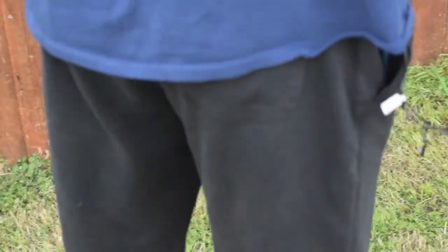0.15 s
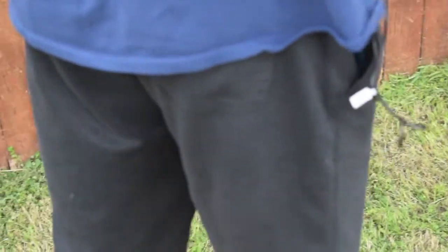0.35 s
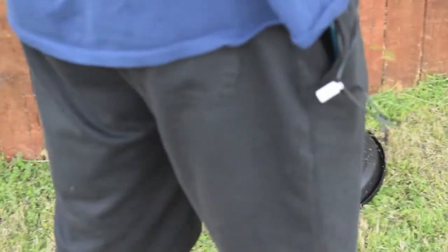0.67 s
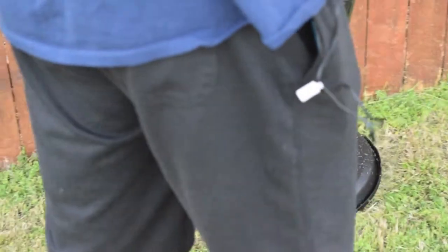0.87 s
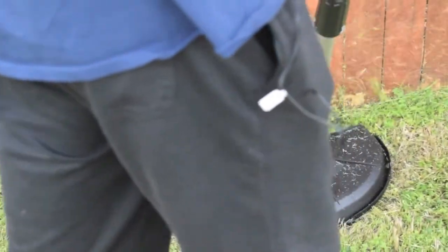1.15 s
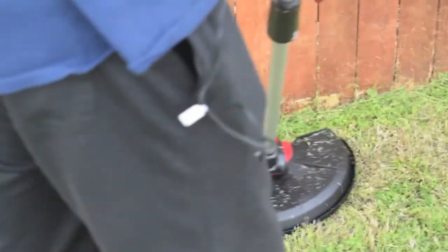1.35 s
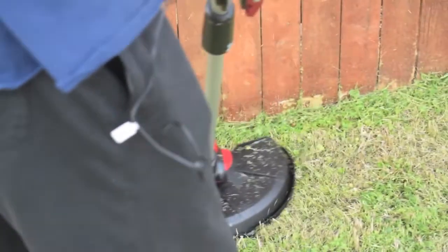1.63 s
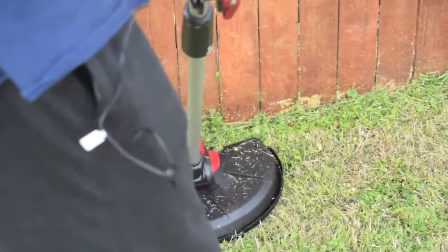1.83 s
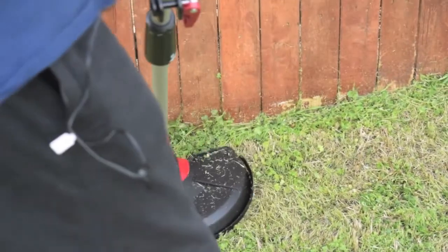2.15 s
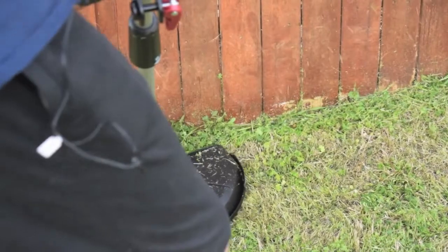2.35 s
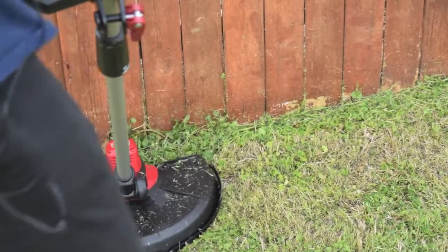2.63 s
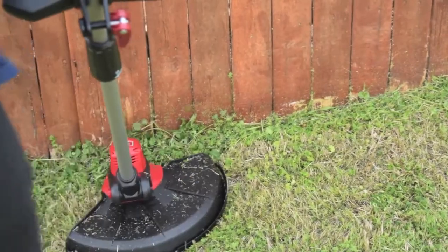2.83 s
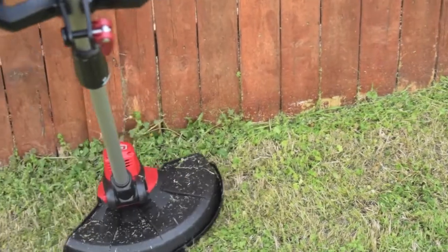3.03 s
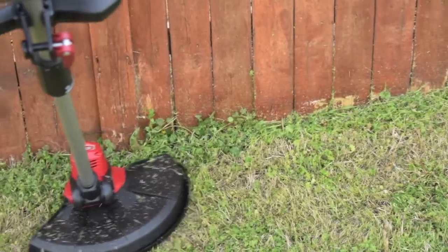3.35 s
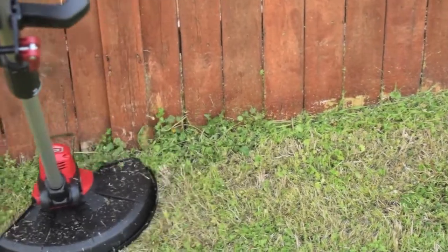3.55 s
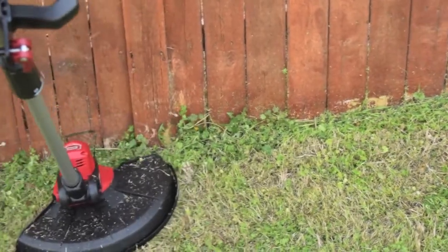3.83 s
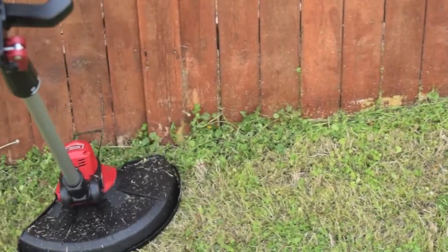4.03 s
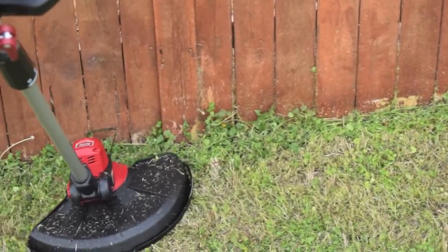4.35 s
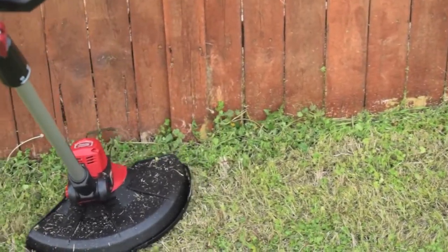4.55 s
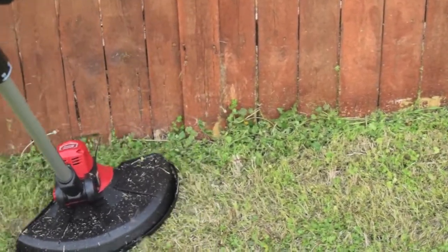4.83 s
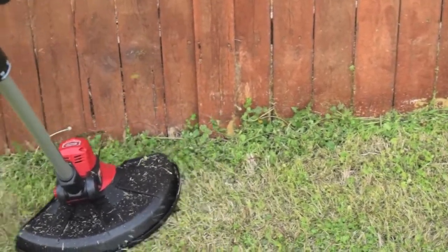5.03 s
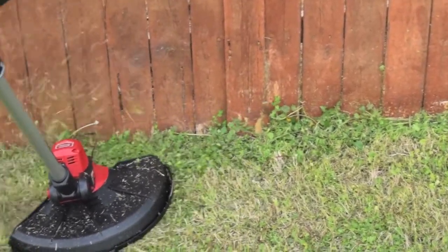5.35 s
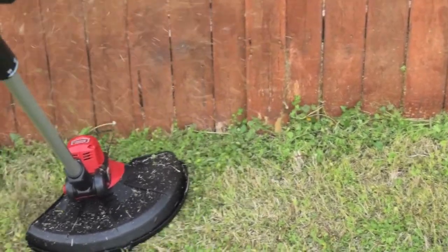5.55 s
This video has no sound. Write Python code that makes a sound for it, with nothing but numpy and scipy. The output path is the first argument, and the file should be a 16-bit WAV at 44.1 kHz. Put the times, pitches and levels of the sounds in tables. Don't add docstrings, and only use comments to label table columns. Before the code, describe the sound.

A cordless string trimmer runs throughout at close range, heard dry and identical in both channels, with a faint breeze and traffic rumble buried underneath. The tone is a dense buzz around 415 to 425 Hz with many harmonics, topped by a strong fluttering hiss centred near 7 to 8 kHz. It begins already loaded, thrashing grass, with snaps and thuds at 0.1 and 0.36 s, then recovers. At 1.2 to 1.4 s a heavy bite drops the pitch audibly, with ragged slaps, stalk snaps and fence knocks. From 1.5 to 3.7 s it runs fairly steadily, with small dips and slightly fuller hiss. A tight burst of bright cracks and snaps comes at 3.75 to 3.9 s. The drone then smooths out, with a brief dip and snap near 5.05 s. From 5.58 s until the cut at 5.7 s, thick grass slows it again, with rapid snaps and thuds.

```python
import sys
import numpy as np
from scipy import signal
from scipy.fft import rfft, irfft, next_fast_len
from scipy.io import wavfile
from scipy.ndimage import uniform_filter1d

SR = 44100
rng = np.random.default_rng(int(sys.argv[2]) if len(sys.argv) > 2 else 0)


def gain_from_db(level_db):
    decades = np.asarray(level_db, float) / 20
    return 10 ** decades


def inscribe(sig):
    pcm = np.round(np.clip(np.atleast_2d(sig).T, -1, 1) * 32767)
    wavfile.write(sys.argv[1], SR, pcm.astype(np.int16))


N = 250929


def evened(x):
    return x / np.sqrt(np.mean(x ** 2) + 1e-20)


def levelled(x, width):
    return x / np.sqrt(uniform_filter1d(x ** 2, width) + 1e-20)


def curves(rows, t):
    s, *columns = np.transpose(rows)
    return [np.interp(t, s, c) for c in columns]


def read(points, hz):
    f, db = np.transpose(points)
    return np.interp(np.log(hz + 1), np.log(f + 1), db)


def coloured(x, points):
    size = next_fast_len(N)
    gain = gain_from_db(read(points, np.fft.rfftfreq(size, 1 / SR)))
    return evened(irfft(rfft(x, size) * gain, size)[:N])


def high_pass(x, hz):
    return signal.sosfilt(signal.butter(2, hz, "high", fs=SR, output="sos"), x)


def drift(count, seconds):
    steps = rng.standard_normal((count, N // 441 + 2))
    width = round(seconds * 100)
    steps = evened(uniform_filter1d(uniform_filter1d(steps, width, 1), width, 1))
    return np.array([np.interp(np.arange(N) / 441, np.arange(len(v)), v) for v in steps])


def per_pass(turns):
    count = 2 * len(turns) // 300
    return np.interp(2 * turns, np.arange(count), rng.standard_normal(count))


# time in seconds, stance (0 shaded, 1 beside, 2 open, 3 turned, 4 shaded).
STANCE = [
    (0, 0),
    (1.3, 0),
    (1.7, 1),
    (2.75, 1),
    (2.88, 2),
    (3.72, 2),
    (3.95, 3),
    (4.95, 3),
    (5.15, 4),
    (5.69, 4),
]


def by_stance(values, t):
    return np.interp(curves(STANCE, t)[0], np.arange(len(values)), values)


# centre in seconds, half width in seconds, drag in turns per s,
# thrash in dB, swish in dB.
BITES = [(0.025, 0.08, 9.5, -37.5, -33.5), (0.139, 0.028, 6.8, -31, -36), (0.36, 0.033, 5.3, -34.5, -40),
         (0.461, 0.14, 3.4, -39.5, -38), (0.784, 0.13, 3.2, -43.5, -47), (1.03, 0.083, 2.65, -43.5, -59),
         (1.228, 0.057, 5.4, -37.5, -34), (1.311, 0.053, 17.7, -31, -46), (1.506, 0.069, 2.62, -40.5, -41),
         (1.831, 0.158, 3.33, -40.5, -37), (2.062, 0.068, 3.5, -40.9, -38), (2.41, 0.21, 2.76, -41, -37.5),
         (2.556, 0.076, 2.13, -38.5, -41), (2.973, 0.19, 2.13, -44, -44.5), (3.462, 0.12, 2.68, -44.5, -37),
         (3.796, 0.031, 8.2, -36, -30), (3.886, 0.063, 4.7, -38, -31.5), (4.029, 0.055, 4, -43.3, -35),
         (4.34, 0.2, 2.85, -50, -38.5), (4.745, 0.17, 1.34, -47, -41.5), (5.067, 0.059, 10.1, -35.5, -38),
         (5.31, 0.11, 3.4, -44.5, -36.5), (5.591, 0.026, 8.5, -31, -30.5), (5.669, 0.094, 19, -33.5, -37)]
BITE_S, BITE_WIDTH_S, BITE_DRAG, BITE_THRASH_DB, BITE_SWISH_DB = np.transpose(BITES)


def contact(sizes, t, power=1):
    steps = np.arange(N // 147 + 2) / 300
    bells = [np.exp(-.5 * power * ((steps - s) / width) ** 2) for s, width in zip(BITE_S, BITE_WIDTH_S)]
    return np.interp(t, steps, sizes @ np.array(bells))


def sag(t):
    start_sag, recover_s = 9.15, .0913
    steps = np.arange(N // 441 + 2) / 100
    r = np.exp(-steps[1] / recover_s)
    lost = signal.lfilter([1 - r], [1, -r], contact(BITE_DRAG, steps), zi=[r * start_sag])[0]
    return np.interp(t, steps, lost)


def shaft_turns(t):
    start_turn, free_turns_per_s, tiring_turns_per_s2 = .08, 107.0, .022
    return start_turn + np.cumsum(free_turns_per_s - tiring_turns_per_s2 * t - sag(t)) / SR


# time in seconds, fourth order in dB, second order in dB.
HEAD = [(0.0, -33, -43), (.2, -30.5, -43), (.5, -28.5, -49.5), (.6, -29, -62), (.9, -30, -52),
        (1.25, -28, -45), (1.33, -32, -37.5), (1.49, -31, -53), (1.63, -27.5, -40.5), (2.3, -29.5, -39.5),
        (3.0, -31.5, -38.5), (3.6, -32.5, -43), (4.07, -31, -43), (4.36, -29, -47.5), (4.9, -29, -54.5),
        (5.06, -29, -43.5), (5.3, -30.5, -50), (5.69, -32, -40)]
# multiple of shaft rate, level in dB.
SHADED_ORDERS = [(1, -43), (2, -25), (3, -21.5), (4, 3), (5, -13.5), (6, -5), (7, -16), (8, -12.5),
                 (9, -20.5), (10, -6.5), (11, -39), (12, -12.5), (13, -43), (14, -16), (15, -115),
                 (16, -16.5), (17, -67), (18, -32), (19, -20), (20, -16.5), (21, -55), (22, -16.5),
                 (23, -60), (24, -21.5), (25, -43), (26, -25)]
BESIDE_ORDERS = [(1, -36.5), (2, -13), (3, -24), (4, 1.5), (5, -14), (6, -5), (7, -15.5), (8, -10.5),
                 (9, -19), (10, -5), (11, -37), (12, -14), (13, -23), (14, -16), (15, -46), (16, -17),
                 (17, -19.5), (18, -38), (19, -24), (20, -15.5), (21, -44), (22, -19.5), (23, -21),
                 (24, -34), (25, -24), (26, -27)]
OPEN_ORDERS = [(1, -45.5), (2, -11), (3, -21), (4, 2.5), (5, -15), (6, -6), (7, -16.5), (8, -16.5),
               (9, -20), (10, -10), (11, -33), (12, -17), (13, -22), (14, -11), (15, -75), (16, -10),
               (17, -23), (18, -14), (19, -23), (20, -14), (21, -26), (22, -16.5), (23, -57), (24, -21.5),
               (25, -40), (26, -21.5)]
TURNED_ORDERS = [(1, -39.5), (2, -22), (3, -24.5), (4, 1.5), (5, -15.5), (6, -8.5), (7, -16.5), (8, -12.5),
                 (9, -21), (10, -6.5), (11, -30), (12, -13.5), (13, -25), (14, -14), (15, -47), (16, -14),
                 (17, -40), (18, -16), (19, -33), (20, -14), (21, -34), (22, -13), (23, -29), (24, -16.5),
                 (25, -29), (26, -22)]
# 28th, 34th, 40th, 46th order in dB re the 26th.
FAINT_ORDERS = [
    (-6, -3, -2, -12),
    (-3, -2, -3, -18),
    (-1.5, -11, -5.5, -4),
    (-2, -3, -7, -3),
    (-2, -4, -15, -16),
]
UPPER_DB = [-2.1, -2.03, -1.2, -1.42, -0.15]
UNBALANCE_DB = [9, 0.5, 7.5, -1.5, 6.5]
# start in seconds, length in seconds, first order extra in dB.
WOBBLES = [
    (2, 0.34, 12),
    (3.059, 0.34, 8.5),
]


def thump(t, turns):
    main_db, second_db = curves(HEAD, t)
    upper_db = by_stance(UPPER_DB, t) - 0.97 * (main_db - main_db.mean())
    main_db = main_db - 0.19 * (contact(BITE_DRAG, t) - 3.0)
    blur_db = 0.17 * (sag(t) - 3.0)
    whine_db = 0.4 * (uniform_filter1d(sag(t - .12), size=4410) - 3.0)
    unbalance_db = by_stance(UNBALANCE_DB, t)
    for s, length, db in WOBBLES:
        unbalance_db = unbalance_db + db * np.clip(np.minimum(t - s, s + length - t) / 0.049, 0, 1)
    stances = [SHADED_ORDERS, BESIDE_ORDERS, OPEN_ORDERS, TURNED_ORDERS, SHADED_ORDERS]
    orders_db = np.array(stances)[:, :, 1].T
    faint = np.arange(28, 48, 2)
    faint_db = np.transpose([np.interp(faint, faint[::3], row) for row in FAINT_ORDERS])
    orders = np.r_[np.arange(len(orders_db)) + 1, faint]
    orders_db = np.r_[orders_db, orders_db[-1] + faint_db]
    out = 0
    for k, levels_db, w in zip(orders, orders_db, drift(count=len(orders), seconds=.06)):
        unsteady_db = .3 if k == 4 else 0.95 + 0.019 * min(k, 20)
        db = main_db + by_stance(levels_db, t) + unsteady_db * w
        if k == 1:
            db = db + unbalance_db
        if k == 2:
            db = second_db
        if k > 4:
            db = db + upper_db
        if k > 12:
            db = db - blur_db
        if k > 27:
            db = db + whine_db + 4.0 * (np.minimum(w, .5) - .6)
        lag = np.angle(1 - (k / 4) ** 2 + 1.2j * k / 4) + 1.2 * (k % 2)
        lag = lag + np.exp(-((k - 11) / 2) ** 2)
        phase = 2 * np.pi * k * turns - lag + 0.051 * k * w
        out = out - gain_from_db(db) * np.sqrt(2) * np.sin(phase)
    return out


# time in seconds, hiss in dB, treble in dB for a clear view past the legs.
HISS = [(0, -22.5, -1.5), (.27, -21, -4.5), (.7, -20.5, -1), (.9, -18, 3), (1.17, -18, 2), (1.33, -23.5, 0),
        (1.46, -18.5, 5.5), (1.7, -18, 2.5), (2.06, -18, -4), (2.71, -17, 3), (3.0, -17.5, -1.5),
        (3.79, -21.5, 0.5), (3.96, -20.5, -3), (4.58, -19.5, -3), (5.15, -19, 0), (5.31, -17.5, 2),
        (5.51, -16.5, 2.5), (5.62, -22.5, 1.5)]
# frequency in Hz, density in dB per Hz.
HISS_COLOUR = [(2500, -47), (3800, -30.5), (5000, -15.5), (6500, -7), (7500, -1), (9000, -2), (10500, -7.5),
               (12000, -14.5), (13000, -23.5), (15700, -31.5), (17000, -66)]
# lower skirt, upper skirt, whistle prominence, skirt foot, all in dB.
SKIRTS = [
    (-9.5, -8, 3.5, -23.5),
    (-9, -8, 3, -26),
    (-9.5, -7, 3, -28),
    (-13, -6, 3.5, -27.5),
    (-12.5, -10.5, 3.5, -27),
]
# time in seconds, frequency in Hz.
WHISTLE = [(0, 7400), (1.2, 7400), (1.5, 7050), (2.0, 7300), (2.35, 7650), (2.75, 7100), (2.83, 7850),
           (3.05, 7700), (3.5, 8000), (3.8, 8000), (4.15, 8400), (4.3, 8200), (4.42, 7700), (4.65, 7750),
           (4.92, 8200), (5.05, 7500), (5.69, 7250)]
TWIN_DB = [0.55, 1.19, 2.37, 2.33, 0.04]
# time in seconds, frequency in Hz, depth in dB.
GROUND = [(2.75, 4600, 0), (2.92, 4700, 6), (3.3, 4800, 7), (3.5, 5050, 6), (3.75, 5150, 5),
          (3.85, 5100, 1), (4.1, 5150, 4), (4.4, 5050, 2), (4.7, 4800, 3), (4.92, 4600, 4), (5.05, 4600, 0)]
# time in seconds, level in dB.
TILT = [(0, -8), (.3, 1), (.9, 0), (1.3, -0.5), (1.5, 6), (1.8, 2.5), (2.3, -3.5), (2.6, 0), (2.9, 3),
        (3.1, -3), (3.7, -3.5), (4.4, -1), (4.55, 0), (4.8, -1), (5.03, 10.5), (5.2, -4), (5.69, 0)]


def hiss_db(t, at, hz):
    def bump(centre_hz, width_hz):
        return np.exp(-((hz - centre_hz) / width_hz) ** 2)

    low_db, high_db, whistle_db, foot_db = (by_stance(c, at) for c in np.transpose(SKIRTS))
    sway = [np.interp(at, t, w) for w in drift(count=4, seconds=.08)]
    lost = sag(at) - 3.0
    tilt_db, clear_db = curves(TILT, at)[0], curves(HISS, at)[1]
    low_db = low_db + 0.39 * lost + 0.5 * sway[0] + 0.2 * tilt_db
    foot_db = foot_db + 0.63 * lost + 0.55 * sway[1] + tilt_db
    high_db = high_db + 1.5 * sway[2] + clear_db
    whistle_db = whistle_db + 1.3 * sway[3]
    whistle_hz = curves(WHISTLE, at)[0]
    notch_hz, notch_db = curves(GROUND, at)
    foot = 1 / (1 + np.exp((hz - 5250) / 120))
    low = (1 - foot) * np.clip((7600 - hz) / 1500, 0, 1)
    high = 1 / (1 + np.exp((9500 - hz) / 300))
    db = read(HISS_COLOUR, hz - 0.28 * (whistle_hz - 7500) * bump(7500, 2000))
    db = db + low * (low_db + 12.5) + high * (high_db + 12.0) + foot * (foot_db + 26.0)
    db = db + whistle_db * bump(whistle_hz, 380) - notch_db * bump(notch_hz, 260)
    return db + by_stance(TWIN_DB, at) * bump(whistle_hz + 1200, 350)


def hiss(t, turns):
    frames, hz = N // 128 + 5, np.fft.rfftfreq(512, 1 / SR)[:, None]
    at = np.arange(frames) * 128 / SR - 128 / SR
    a, b, patches = rng.standard_normal((frames, 257, 3)).T
    patches = evened(uniform_filter1d(uniform_filter1d(patches, 6, 0), 60, 1))
    z = (a + 1j * b) * gain_from_db(hiss_db(t, at, hz) + 1.2 * patches)
    upper = 1 / (1 + np.exp((8200 - hz) / 400))
    unlike = .12 + 0.047 * np.maximum(sag(t) - 2.5, 0)
    aim = .5 * drift(count=1, seconds=0.9)[0]
    out = 0
    for share, lead, depth in ((np.sqrt(1 - upper), 0, .36), (np.sqrt(upper), .9, .3)):
        beam = depth * np.cos(4 * np.pi * turns + lead + aim)
        beam = beam + .5 * unlike * np.cos(2 * np.pi * turns + lead)
        noise = signal.istft(z * share, nperseg=512, noverlap=384)[1][:N]
        out = out + noise * np.exp(beam) * gain_from_db(0.99 * per_pass(turns))
    return gain_from_db(curves(HISS, t)[0]) * levelled(out, 6000)


# frequency in Hz, density in dB per Hz.
THRASH = [(60, -42), (120, -19.5), (180, -4), (250, -3.5), (450, 6), (800, 4), (1200, 5), (1600, -17.5),
          (2200, -9), (3500, -29)]
# frequency in Hz, density in dB per Hz.
SWISH = [(800, -17), (1400, -5), (2000, 1.5), (2600, -3.5), (3300, -9), (4200, -10.5), (5000, -7.5),
         (6000, -6.5), (12000, -19), (15700, -9)]


def grass(t, turns):
    idle_thrash_db, idle_swish_db = -48.5, -39.5
    ragged = drift(count=2, seconds=.03)
    thrash_gain = np.sqrt(gain_from_db(idle_thrash_db) ** 2 + contact(gain_from_db(BITE_THRASH_DB) ** 2, t, 1.76))
    swish_gain = np.sqrt(gain_from_db(idle_swish_db) ** 2 + contact(gain_from_db(BITE_SWISH_DB) ** 2, t, 1.6))
    passes = np.diff(np.floor(2 * turns + .06 * per_pass(turns)), prepend=0)
    slaps = passes * rng.standard_normal(N)
    burst = np.exp(-(2 * turns % 1) / .3) * gain_from_db(3.0 * per_pass(turns))
    skim = 1 / (1 + (contact(BITE_DRAG, t) / 12) ** 2)
    wash = (0.22 + 1.6 * skim + burst) * rng.standard_normal(N)
    thrash = levelled(0.35 * coloured(slaps, THRASH) + 1.2 * coloured(wash, THRASH), 4000)
    swish = coloured((0.71 + burst) * rng.standard_normal(N) + 5.2 * slaps, SWISH)
    thrash = thrash_gain * gain_from_db(1.5 * ragged[0]) * thrash
    return thrash + swish_gain * gain_from_db(0.4 * ragged[1] - 3.0) * swish


FENCE_SHARE = [0.1, 0.033, 0.093, 0.065, 0.06]


def fence(x, t):
    late = np.interp(t - 0.001, t, signal.lfilter([.5, .5], [1], x))
    return x - by_stance(FENCE_SHARE, t) * late


# time in seconds, frequency in Hz, depth in dB.
HOLLOW = [(0, 3900, 0), (.3, 3700, 4), (.7, 3100, 5), (1.3, 3700, 4), (1.5, 3100, 2), (2.1, 3850, 5),
          (2.6, 3400, 3), (3.1, 3900, 6), (3.3, 3900, 5), (3.5, 4100, 3), (3.8, 4100, 0), (4.35, 4100, 1),
          (4.5, 4100, 7), (4.75, 4000, 6), (4.95, 3700, 4), (5.1, 3700, 0), (5.4, 3900, 5), (5.69, 3800, 1)]


def hollow(x):
    hz, t, z = signal.stft(x, SR, nperseg=512)
    dip_hz, dip_db = curves(HOLLOW, t)
    off_hz = hz[:, None] - dip_hz
    shape = 0.26 * np.exp(-(off_hz / 900) ** 2) - np.exp(-(off_hz / 250) ** 2)
    return signal.istft(z * gain_from_db(dip_db * shape), SR, nperseg=512)[1][:N]


# frequency in Hz, density in dB per Hz.
RUMBLE = [(20, -12), (50, -26), (90, -15), (150, 4), (250, -32)]


def rumble():
    level_db = -88 + 3.0 * drift(count=1, seconds=.1)[0]
    return gain_from_db(level_db) * coloured(rng.standard_normal(N), RUMBLE)


# time in seconds, level in dB, ring in Hz, decay in cycles.
SNAPS = [(.124, -20, 890, 1.7), (.135, -25, 1210, 2), (.355, -31, 903, 1.5), (.368, -24, 890, 2),
         (1.222, -23, 1100, 1.01), (1.283, -22, 1102, 1), (1.292, -24, 1150, 2.3), (1.326, -26, 900, 1.5),
         (1.362, -18, 1100, 1.1), (3.749, -31, 1490, 0.64), (3.759, -25, 1500, 0.66),
         (3.768, -14.5, 1602, 0.66), (3.778, -18, 1000, 0.61), (3.788, -12, 1202, 0.72),
         (3.798, -13, 1300, 0.63), (3.812, -26, 1800, 1), (3.847, -24, 900, 1.1), (3.866, -26, 1202, .7),
         (3.891, -22, 1710, 1), (5.032, -22, 1197, 1.67), (5.577, -17, 500, 1.03), (5.586, -19, 1100, 2),
         (5.596, -20, 1150, 2.4), (5.607, -19, 1100, 1.5), (5.618, -19, 1150, 1.2), (5.634, -24, 1000, 1.5),
         (5.651, -18, 1100, 1.6), (5.672, -24, 1000, 0.9)]


def snaps(pulses):
    out, u, near = np.zeros(N + 900), np.arange(900) / SR, 55
    for s, db, hz, cycles in SNAPS:
        first = round(s * SR) - near
        crest = first + np.argmax(pulses[first:][:2 * near])
        ring = np.sin(2 * np.pi * hz * u) * np.exp(-u * hz / cycles)
        out[crest - round(SR / hz / 5):][:900] += gain_from_db(db) * ring
    return high_pass(out[:N], 300)


# time in seconds, thud in dB, crack in dB re thud.
STRIKES = [(0.133, -15, -4), (.36, -13, -8), (1.282, -21, -11), (1.345, -15, 6), (1.3608, -12, -16),
           (3.766, -26, 12), (3.787, -18, 21.5), (3.885, -18, -8), (5.606, -11.5, -11), (5.6167, -10, -14),
           (5.649, -11, 2), (5.683, -15, -10)]


def strikes():
    out, u = np.zeros(N + 900), np.arange(900) / SR
    thud = np.sin(2 * np.pi * 420 * u) * np.exp(-u / 0.0022) * (1 - np.exp(-u / 0.00036))
    thud = thud + .5 * np.sin(2 * np.pi * 1150 * u) * np.exp(-u / 0.00061)
    push = np.exp(-u / .002)
    thud = thud - push * thud.sum() / push.sum()
    for s, thud_db, crack_db in STRIKES:
        crack = np.diff(rng.standard_normal(901)) * np.exp(-u / 0.00037) * 0.47
        out[round(s * SR):][:900] += gain_from_db(thud_db - 1.5) * (thud + gain_from_db(crack_db) * crack)
    return high_pass(out[:N], 220)


def scene():
    t = np.arange(N) / SR
    turns = shaft_turns(t)
    pulses = thump(t, turns)
    noise = hollow(fence(hiss(t, turns) + grass(t, turns), t))
    mono = pulses + noise + rumble() + snaps(pulses) + strikes()
    return np.array([mono, mono])


# frequency in Hz, level in dB re the loud hiss.
MASK = [(10700, -24), (12000, -20.5), (13000, -19.5), (14000, -21), (15000, -22), (15400, -24.5)]
# time in seconds, drop of the mask in dB.
SPARE = [(0, 2), (.6, 4), (.85, -3), (1.05, -2), (1.25, 3), (1.68, -2), (1.9, 3.5), (2.2, 2.5), (2.6, -2),
         (3.7, -2.5), (3.8, 0), (4.3, -1), (4.5, -3), (4.9, -1), (5.08, 3), (5.25, -3), (5.5, -1),
         (5.62, 3)]


def masked_treble(x):
    hz, t, z = signal.stft(x, SR, "cosine", nperseg=2048, noverlap=1024)
    power = abs(z) ** 2
    mask = power[(hz > 6500) & (hz < 10000)].mean(0)
    band = (hz // 345).astype(int)
    luck = rng.standard_normal((len(mask), band[-1] + 1))
    luck = evened(uniform_filter1d(luck, size=3, axis=0)).T[band]
    luck_db = 3 * luck - curves(SPARE, t)[0]
    band_power = np.array([power[band == b].mean(0) for b in range(band[-1] + 1)])[band]
    bar = mask * gain_from_db(luck_db + read(MASK, hz)[:, None]) ** 2
    sparse = np.clip((hz[:, None] - 11500) / 1500, 0, 1)
    tall = power > np.maximum(.9 * bar, 1.7 * sparse * band_power)
    kept = (band_power > bar) & tall | (hz[:, None] < 10700)
    z = z * 1.25 ** sparse
    return signal.istft(z * kept, SR, "cosine", nperseg=2048, noverlap=1024)[1][:N]


def band_limit(x):
    return signal.sosfilt(signal.butter(12, 15730, fs=SR, output="sos"), x)


def record(dry):
    mono = masked_treble(high_pass(dry[0], 80))
    return band_limit(np.array([mono, mono]))


dry = scene()
out = record(dry)
inscribe(out)
```